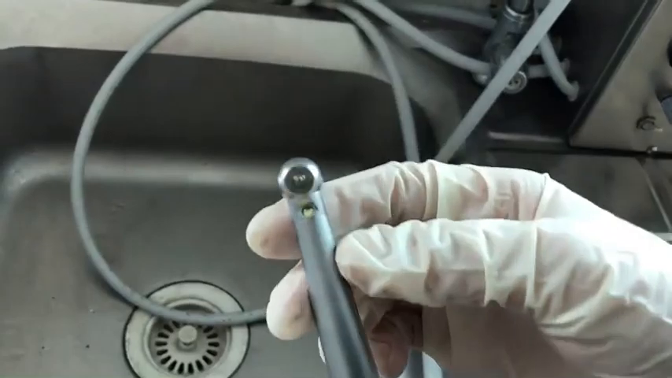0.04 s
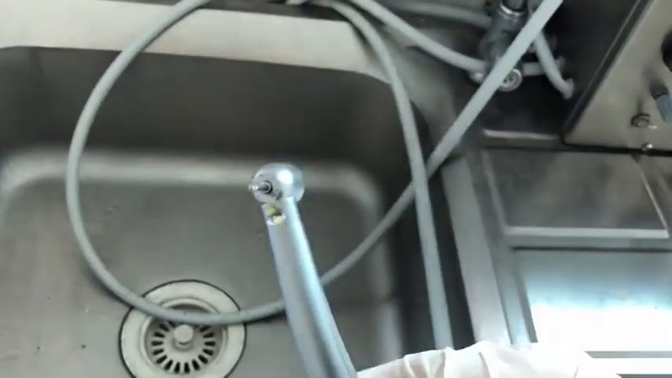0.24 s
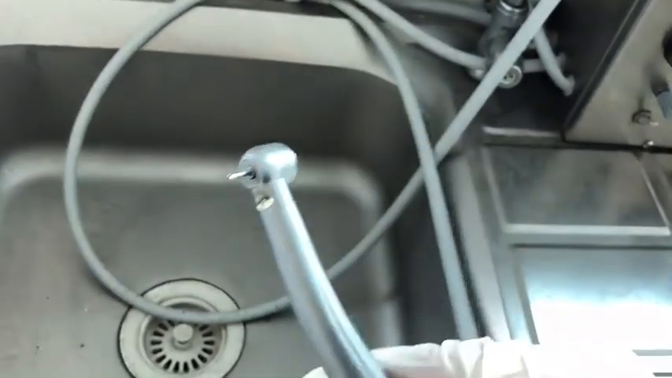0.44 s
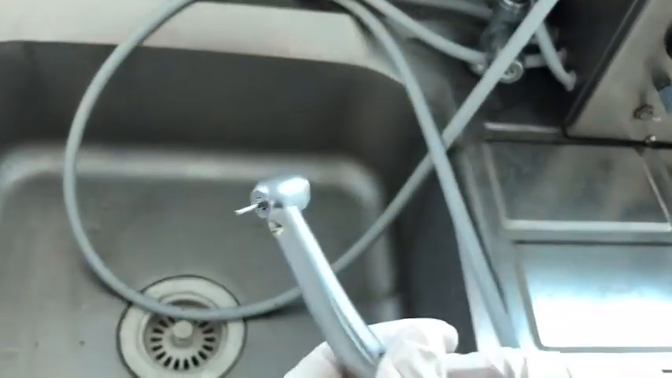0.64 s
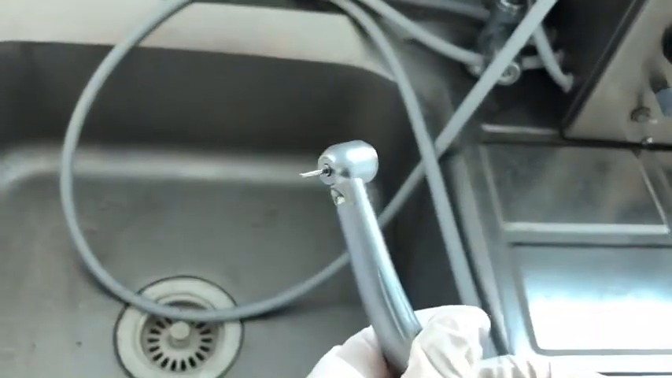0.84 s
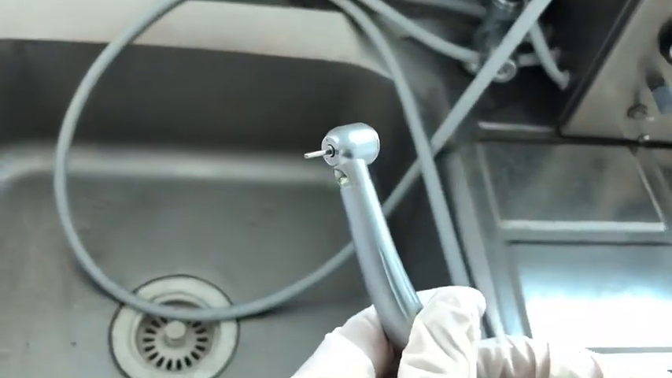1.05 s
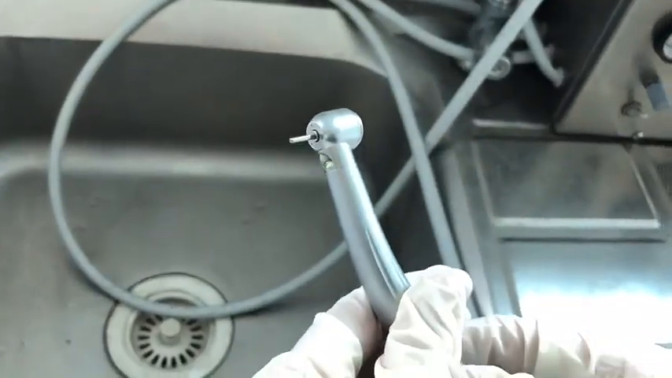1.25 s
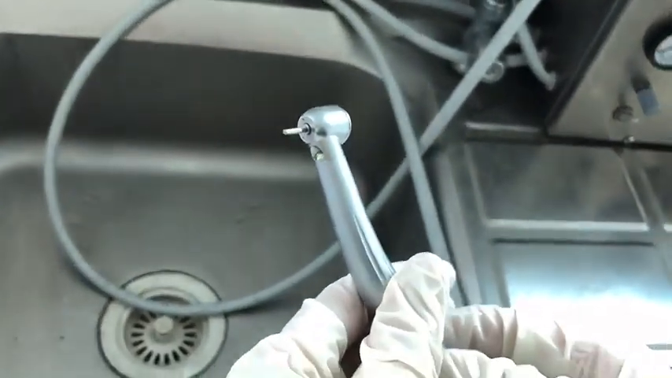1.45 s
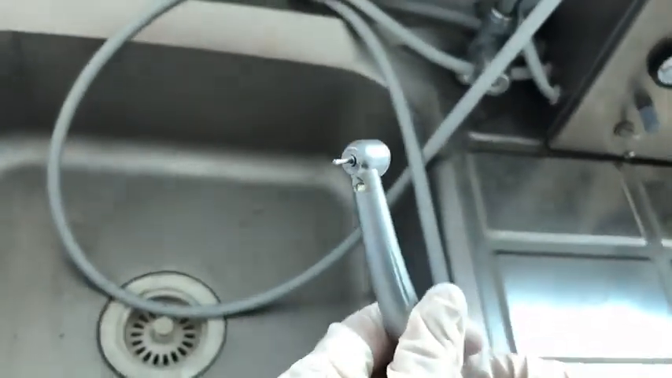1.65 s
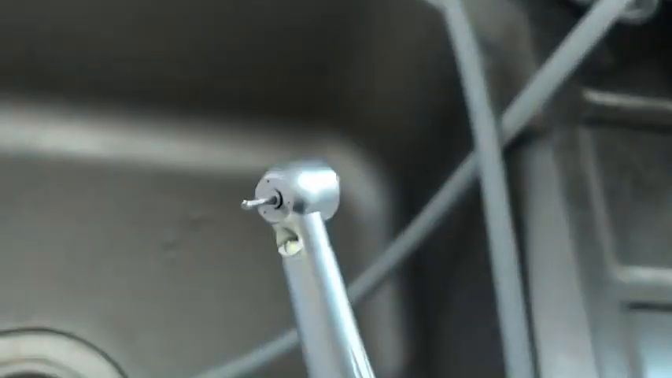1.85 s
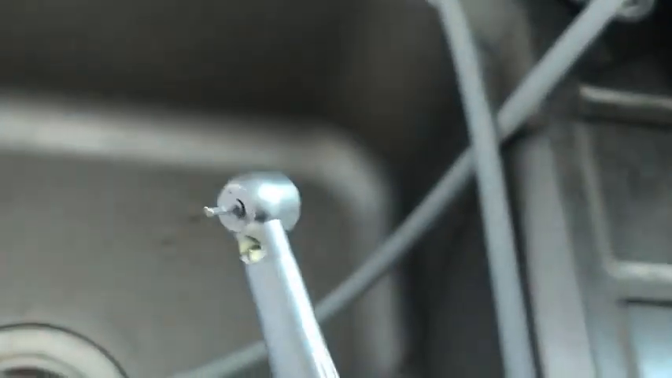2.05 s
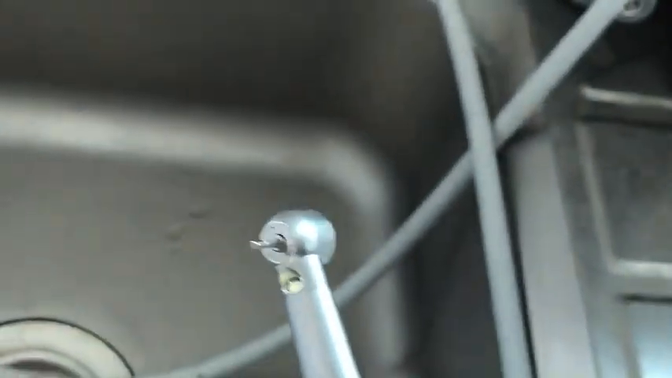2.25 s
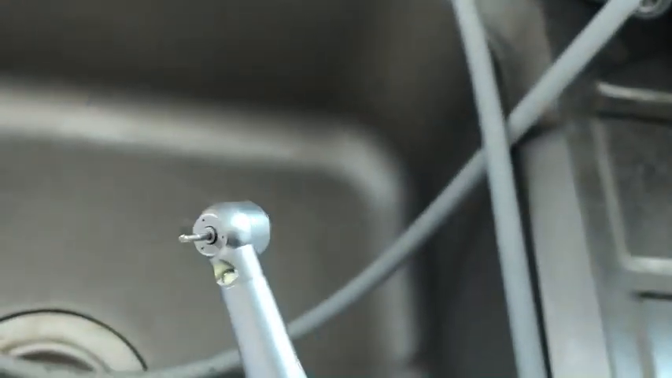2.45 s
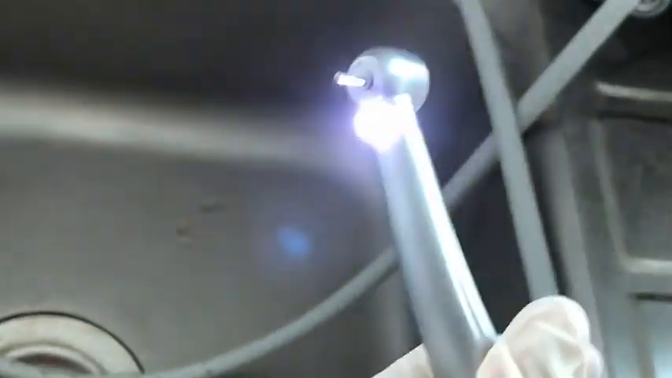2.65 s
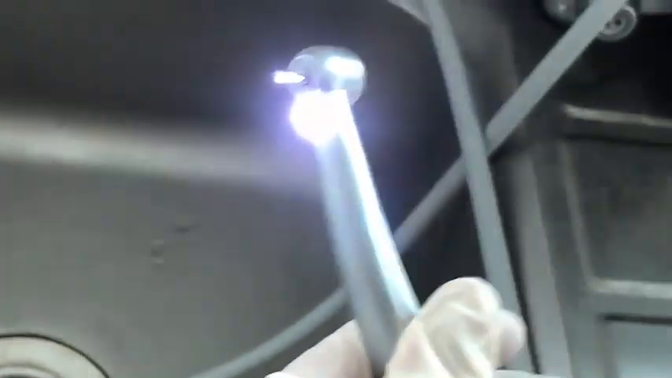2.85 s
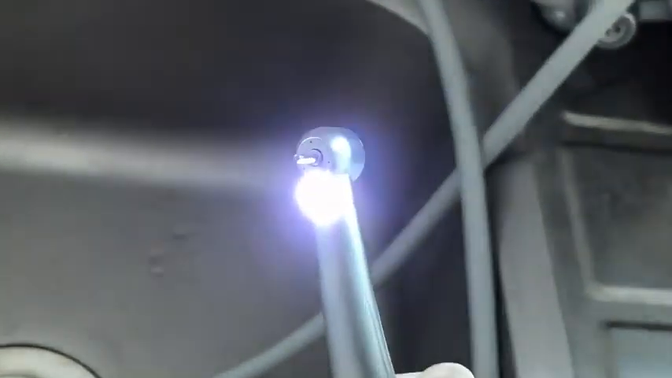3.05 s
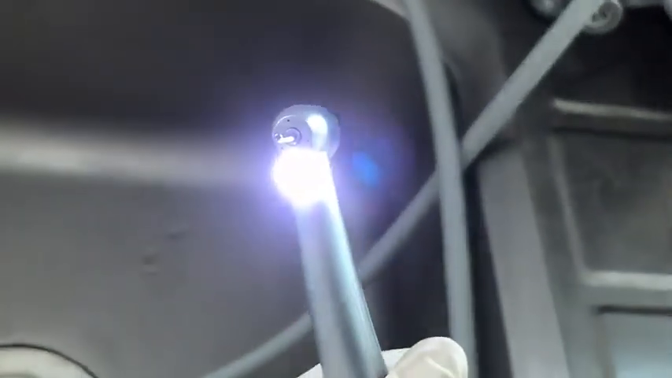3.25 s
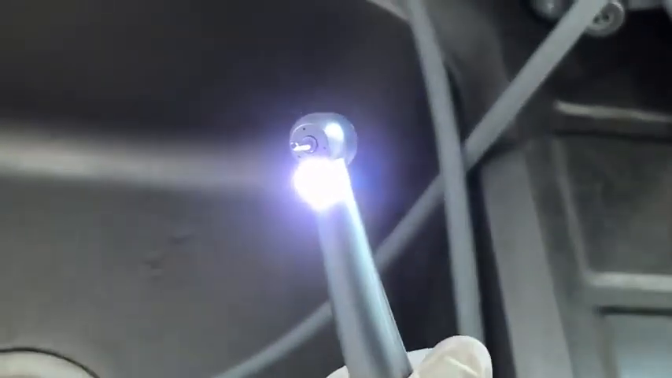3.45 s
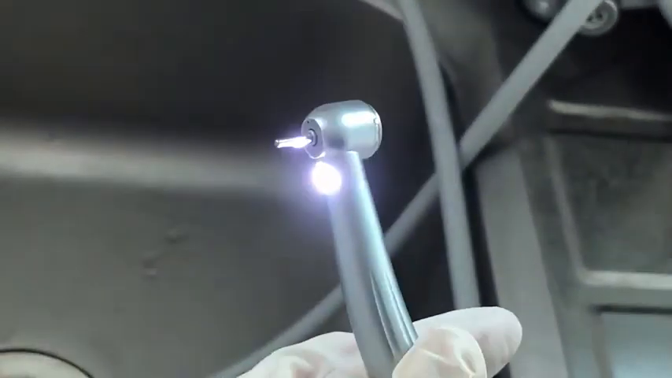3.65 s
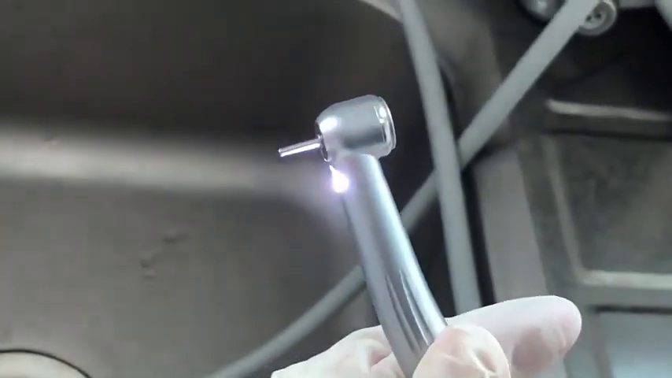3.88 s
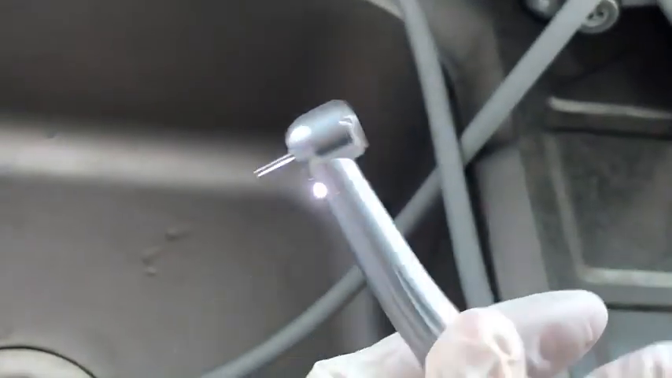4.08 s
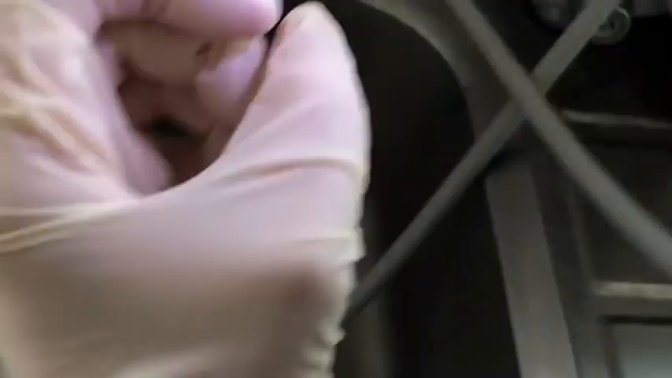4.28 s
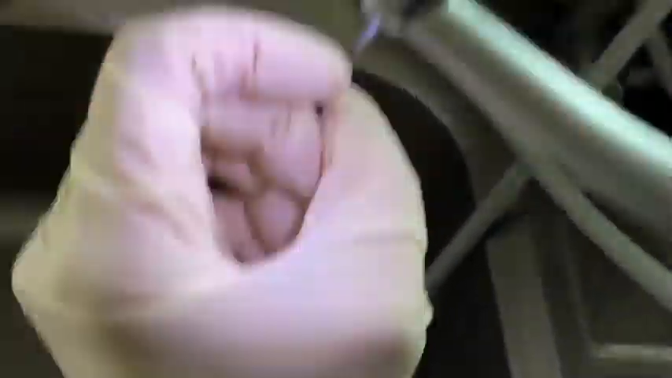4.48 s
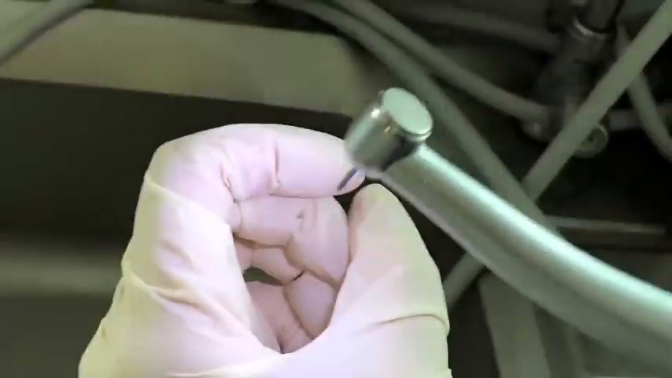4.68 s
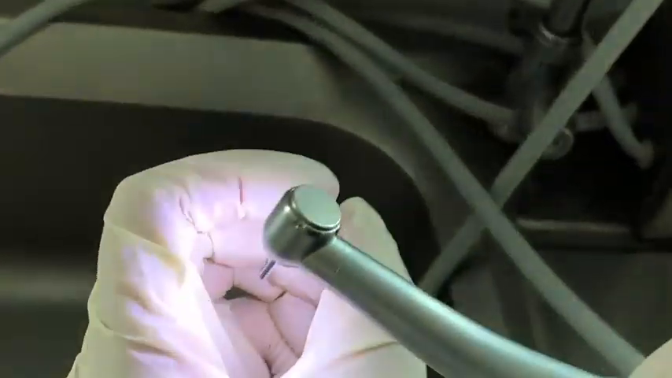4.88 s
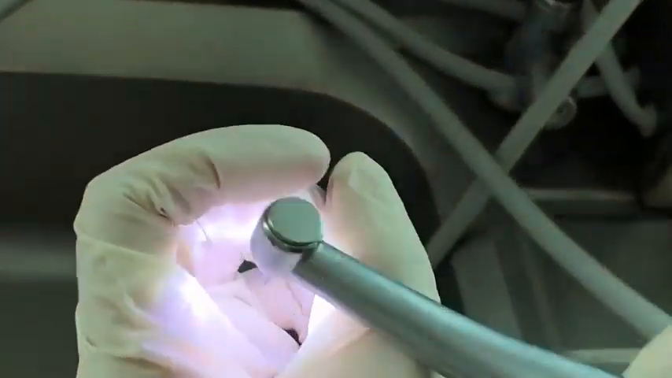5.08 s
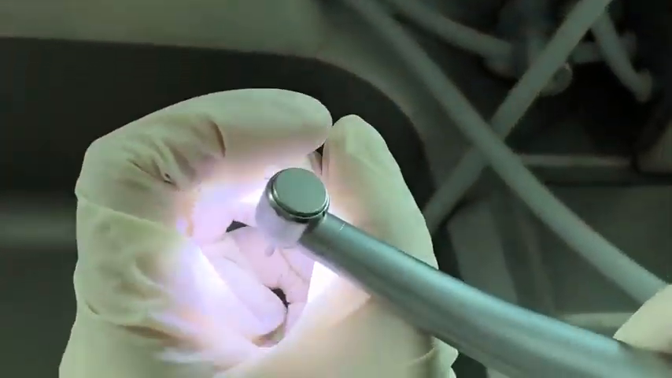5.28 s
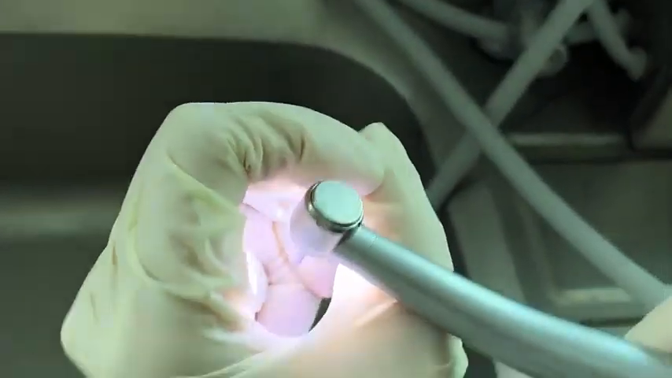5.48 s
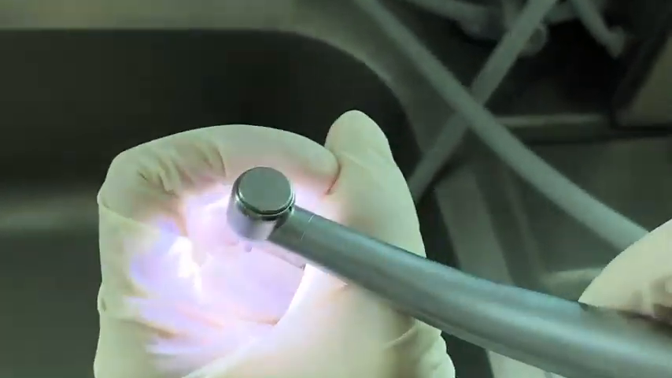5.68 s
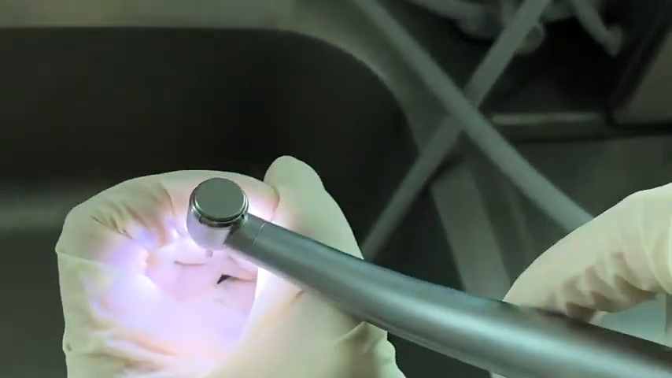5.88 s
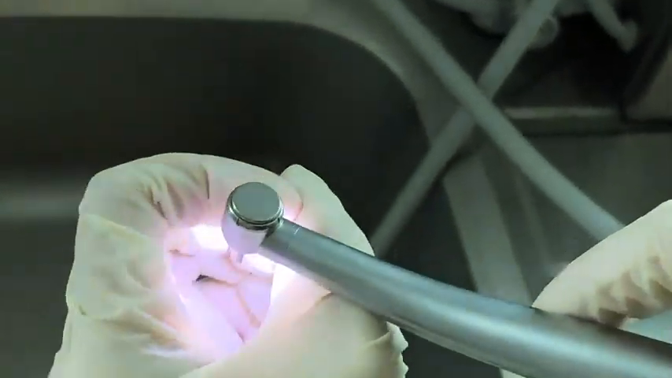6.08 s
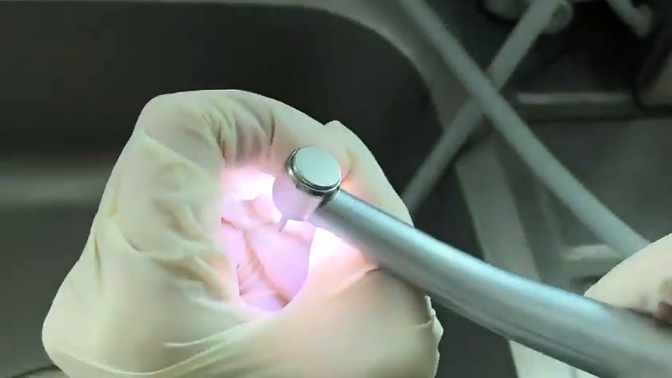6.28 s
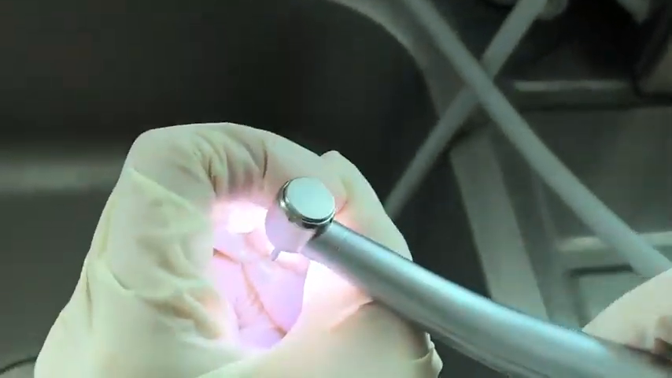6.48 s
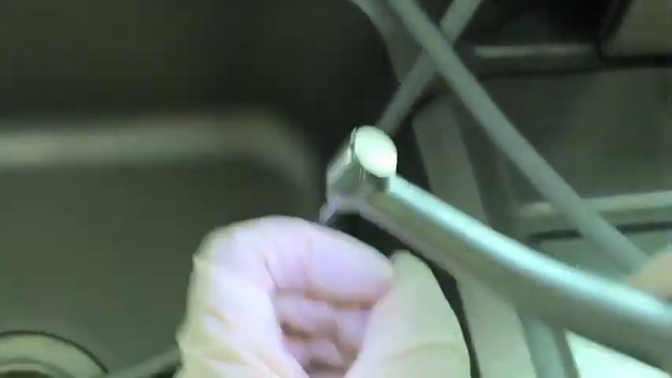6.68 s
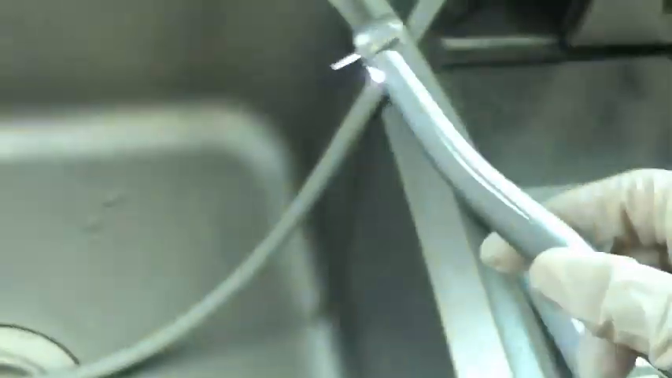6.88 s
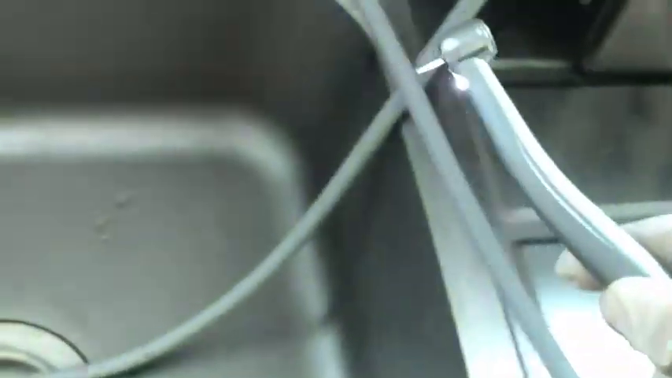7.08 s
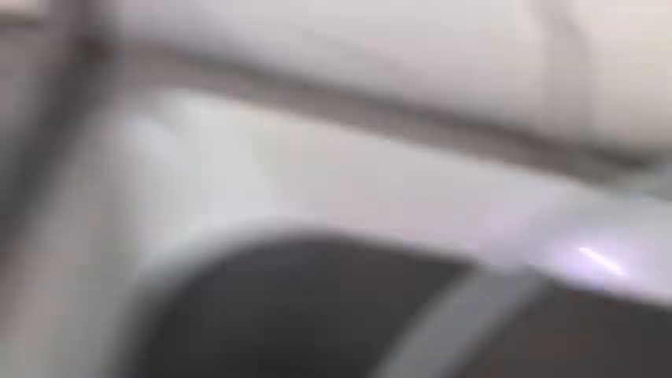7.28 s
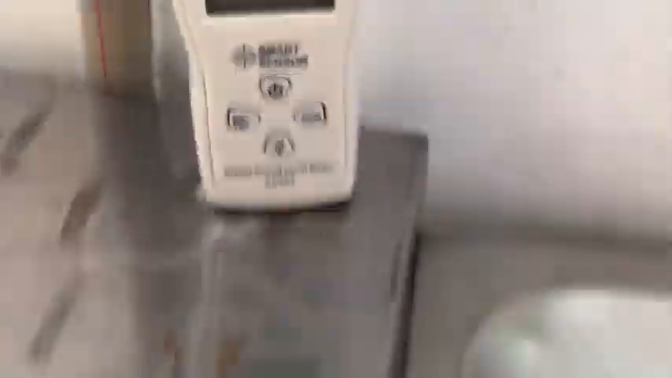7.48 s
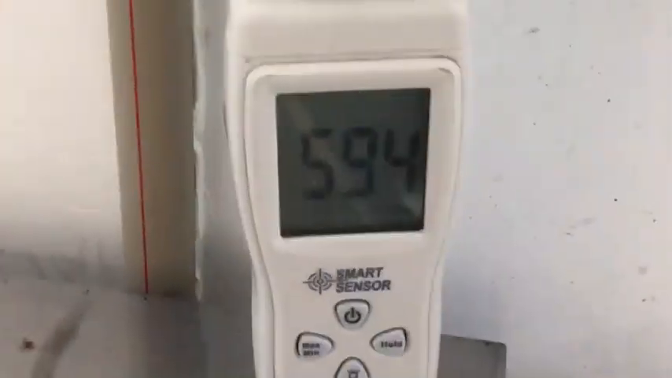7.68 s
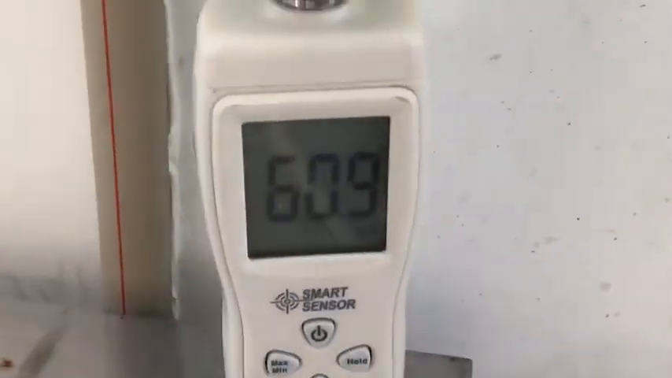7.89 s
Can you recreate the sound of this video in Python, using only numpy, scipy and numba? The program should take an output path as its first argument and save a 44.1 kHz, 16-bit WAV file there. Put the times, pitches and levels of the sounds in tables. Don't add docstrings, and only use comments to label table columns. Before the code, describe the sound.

Over a metal sink, compressed air blows and clicks off, then a small air-driven drill whines steadily in hiss that shifts as it moves.

```python
import sys
import numpy as np
from scipy import signal
from scipy.fft import rfft, irfft, next_fast_len
from scipy.io import wavfile
from scipy.ndimage import uniform_filter1d
from numba import njit

SR = 44100
rng = np.random.default_rng(int(sys.argv[2]) if len(sys.argv) > 2 else 0)


def volts(x):
    e = np.asarray(x, float) / 20
    return 10 ** e


def dump(signal):
    limited = np.clip(np.atleast_2d(signal).T, -1, 1)
    pcm = np.round(limited * 32767).astype(np.int16)
    wavfile.write(sys.argv[1], SR, pcm)


N = 349713
BRIEF = 16384

# freq_hz, density_db
ROOM_AIR = [(24, -44), (40, -14), (91, -11), (136, -5), (224, -21), (260, 6.5), (294, 11), (449, -37),
            (535, -14), (2270, -35.5), (15500, -48.5)]
ROOM_DB = -76.5
# time_s, pitch_hz, level_db
PUMP = [(2.25, 246.6, -90), (2.4, 246.4, -65), (2.6, 240, -81), (2.85, 227.7, -62.5), (3.1, 203, -74),
        (3.2, 200, -86.5)]

# middle_s, length_s, push_db, rumble_db, flap_db
GUSTS = [(.23, 0.15, -75, -70, -95), (.42, 0.15, -81, -91, -84), (.7, .1, -88, -78, -83),
         (2.5, 0.49, -99, -86.5, -71.5), (4.75, 0.31, -85, -80, -77), (6.08, 0.26, -80, -96, -75),
         (6.92, 0.042, -80, -69, -76), (7.68, 0.13, -87, -83, -84), (1.232, 0.064, -95, -63, -57.5),
         (2.0, 0.26, -101, -85, -72), (2.16, 0.078, -101, -96, -64), (2.491, 0.049, -95, -59, -59.5),
         (2.64, 0.055, -88, -84, -74), (3.345, 0.39, -61, -48.5, -45.5), (3.515, 0.036, -67, -48, -44.5),
         (3.67, 0.1, -67, -64, -105), (3.565, 0.036, -70, -56, -63), (3.97, .04, -62, -58, -73),
         (3.95, 0.33, -66, -62.5, -93), (4.171, 0.082, -72, -87, -54.5), (4.42, 0.29, -72, -70, -70),
         (5.88, 0.17, -71, -59, -74), (7.9, 0.21, -68, -68, -95), (7.85, 0.027, -80, -58.5, -74),
         (7.905, .04, -80, -57, -72)]
# push_db, rumble_db, flap_db
CALM_DB = (-91, -73.5, -74.5)
# middle_s, length_s, level_db
SLAPS = [(3.17, .03, -56), (3.21, .022, -48), (3.252, .04, -51), (3.325, .018, -51), (3.347, .018, -48),
         (3.39, .035, -58), (3.445, .035, -52), (3.514, .025, -47)]

# start_s, level_db, centre_hz, decay_s
TICKS = [(0.187, -63, 7800, 0.0013), (.295, -75, 8000, 0.011), (.437, -76, 6000, .008),
         (.658, -80, 6000, .004), (.695, -70.5, 6860, 0.011), (0.821, -77, 5500, .004),
         (2.326, -64, 13000, 0.001), (2.326, -69, 4000, 0.001), (2.354, -70, 8800, 0.002),
         (2.421, -66, 12000, .0015), (2.477, -61, 12000, 0.003), (2.477, -68, 6000, 0.0026),
         (2.641, -50, 9000, .004)]
# middle_s, length_s, level_db
RUSTLE = [(.18, .035, -80.5), (.25, 0.065, -84.5), (.42, .05, -90), (.446, 0.022, -79), (.595, 0.097, -80),
          (.68, .045, -80), (.74, 0.035, -81), (2.17, .06, -75), (2.23, 0.047, -78), (2.379, 0.0063, -53),
          (2.41, 0.054, -81), (2.53, 0.05, -80)]

# start_s, level_db, rise_s, decay_s
PUFFS = [
    (1.082, -60.5, 0.0079, 0.041),
    (1.203, -44.5, 0.017, 0.014),
    (1.953, -38, 0.018, 0.017),
    (2.118, -42, .016, 0.0087),
    (2.362, -49.5, .016, 0.0061),
    (2.6, -58, 0.009, 0.053),
    (4.137, -44.5, 0.016, 0.041),
]
# freq_hz, density_db
PUFF_COLOURS = [
    [(240, -39), (400, -8), (605, -11), (761, -3), (1930, -19), (2400, -11), (9070, -43), (15500, -68)],
    [(240, -46), (400, -17), (972, 1.5), (1850, -4), (2320, -3.5), (5480, -15.5), (10600, -11),
     (15500, -18)],
    [(350, -50), (600, -13.5), (1470, -19), (1990, -6), (2220, -19), (3980, -14), (4620, -4), (15500, -6)],
    [(150, -32), (250, -4.5), (603, -18), (1510, -3.5), (2090, -22), (2570, -10.5), (4390, -22.5),
     (15500, -19)],
    [(290, -48), (500, -18), (2260, 0), (2540, -9), (4500, -7), (4980, 3), (7780, -29), (12300, -13)],
    [(240, -38.5), (400, -6), (797, 1.5), (1760, -14), (2370, -9), (8000, -26), (10400, -51), (17600, -120)],
    [(150, -32), (328, -14), (936, 3.5), (1350, -0.5), (2360, -6), (3000, -17.5), (3900, -51), (6600, -120)],
]
# start_s, centre_hz, width_hz, level_db, decay_s
AFTER_RINGS = [(7.33, 5640, 150, -54.5, 0.013), (1.08, 780, 100, -63, 0.03), (1.085, 2420, 160, -68, .04),
               (1.225, 1100, 200, -58, .02), (1.23, 200, 80, -58, .03), (1.079, 2500, 900, -61.5, .004),
               (1.214, 1400, 1200, -46, 0.0057), (1.965, 9700, 500, -55, .02),
               (1.965, 12100, 600, -50, 0.018), (1.965, 14600, 900, -52, 0.017),
               (1.085, 5900, 1400, -73, 0.032), (1.09, 9000, 700, -84, .02), (1.09, 12200, 900, -86, .02),
               (1.09, 4000, 400, -74, .05), (2.118, 1430, 200, -50, 0.007), (2.122, 2550, 200, -56, .006),
               (2.362, 2250, 200, -56, 0.006), (2.37, 2350, 90, -70, .02), (2.365, 5100, 400, -57, .006),
               (1.97, 1890, 180, -63.5, 0.051), (1.97, 4840, 900, -50.5, 0.036),
               (2.13, 1240, 620, -59, 0.036), (2.139, 390, 39.5, -60.5, 0.062),
               (2.381, 2540, 500, -68.5, .04), (2.381, 4300, 1500, -67, 0.031)]
# start_s, level_db, centre_hz, decay_s
SCUFFS = [(0., -76, 2190, 0.026), (2.485, -63.5, 684, 0.046), (4.068, -58, 750, 0.038),
          (7.03, -65, 900, 0.011), (7.717, -60, 2000, 0.015)]
# start_s, length_s, from_hz, to_hz, level_db
PEDAL_THUMP = [(2.47, .06, 138, 175, -54)]

# time_s, level_db
JET_LEVEL = [(1.2, -68), (1.228, -55), (1.262, -45), (1.31, -44.5), (1.952, -44.5), (1.992, -65),
             (2.05, -79)]
# freq_hz, density_db
JET_AIR = [(290, -57), (500, -20), (2160, -12), (2930, -3), (3190, -10), (4070, -10), (4640, -19),
           (5200, 1.5), (15500, -16)]
# centre_hz, width_hz, level_db
JET_PIPE = [(2000, 130, -14), (2450, 160, -7), (3000, 110, -7), (3500, 160, -3), (3900, 220, -3.5),
            (4200, 290, -1.5), (5180, 280, 0.5), (5700, 85, -6), (6100, 120, -6), (6730, 140, -21),
            (7150, 110, -24), (7700, 200, -10.5), (8800, 610, -10.5)]

# time_s, whine_db, octave_db
WHINE = [(2.69, -70, -90), (2.8, -64, -90), (2.91, -67, -90), (3.05, -57, -85), (3.3, -49, -78),
         (3.64, -43.5, -80), (3.86, -50, -77), (4.06, -58, -74), (4.42, -55, -68), (4.75, -53, -69),
         (5.2, -47, -58), (5.52, -54, -65), (6.1, -51.5, -58), (6.63, -52.5, -68), (6.72, -58, -65),
         (7.55, -57, -66), (7.64, -73, -72), (7.93, -72, -78)]
# middle_s, length_s, hidden_share_db
HIDDEN = [(2.815, .012, -3), (2.9, .06, -3), (3., .012, -3), (3.35, .025, -4), (3.88, .03, -2.5),
          (4.27, .14, -1), (4.56, .12, -8), (4.67, .025, -2.5), (4.91, .03, -4), (5.76, .03, -4),
          (6.62, .02, -2.5), (6.76, .06, -5), (7.02, .08, -8), (7.24, .06, -4), (7.5, .03, -1.5)]
START_S, SPIN_UP_S, BUILD_S = 2.65, .237, 2.5
FREE_HZ, PEAK_S, SAG_HZ_PER_S = 6387, 4.2, 23.5
BLADES = 8
# start_s, length_s,
# from_hz, to_hz,
CATCHES = [(2.645, 0.008, 2900, 800, -50), (2.655, .018, 2300, 3700, -57), (2.67, 0.022, 3800, 5300, -46),
           (2.683, 0.02, 4800, 6100, -47), (2.671, .015, 13400, 15400, -40), (2.68, .013, 9700, 11300, -44),
           (2.695, 0.02, 8800, 10700, -47), (2.71, 0.029, 13100, 15100, -31.5),
           (2.83, 0.037, 4270, 4760, -58)]
# time_s, hiss_db, aim_db
RUSH = [(2.6, -82, -2), (2.63, -68, 4), (2.644, -58, 13.5), (2.696, -43, 8), (2.716, -52, 7)]
# time_s, hiss_db, aim_db
EXHAUST = [(2.8, -49.5, 2), (3.19, -51, 0), (4.0, -48.5, -3), (4.4, -49, 1.7), (4.8, -50, -2.5),
           (5.04, -49.5, -1.5), (5.34, -48, -8.5), (5.58, -50, -5), (5.66, -49.5, 1.5), (5.89, -51, -1.5),
           (6.33, -49, -1.5), (6.64, -49.5, -3.5), (6.7, -51.5, 1), (6.86, -51, -5), (7.3, -53.5, 4.5),
           (7.5, -55.5, 3.5), (7.93, -54.5, 2.5)]
# freq_hz, density_db
DULL_HISS = [(180, -23), (300, -9), (553, -21.5), (1460, -12.5), (1640, -12.5), (3400, -12), (5850, -6.5),
             (6150, -19.5), (6680, -14), (8280, -19), (15500, -14)]
# centre_hz, width_hz, level_db
HEAD_HOLLOWS = [(752, 104, 0), (2320, 90, -0.5)]
# time_s, hollows_db, cage_db, hand_hz
CUPPED = [(2.6, -34, -34, 1500), (4.25, -14, -20, 1500), (4.45, -13, -12, 1520), (4.85, -12.5, -14, 1580),
          (5.1, -10, -14, 1720), (5.5, -13, -14, 1650), (6.1, -10, -13, 1680), (6.45, -9.5, -8, 1690),
          (6.75, -15, -10.5, 1620), (7.05, -13, -13, 1490), (7.35, -18, -16, 1500), (7.53, -16, -6, 1500),
          (7.64, -24, -26, 1500), (7.93, -22, -26, 1500)]
# start_s, length_s, centre_hz, width_hz, change_db
SHADES = [(2.627, .045, 2500, 4000, 10), (2.747, .14, 11100, 3000, -0.5), (2.75, 1.1, 2300, 3900, -1),
          (2.912, 0.77, 11700, 1590, 5), (4.2, 0.37, 4660, 2500, 2.5), (4.204, .45, 9100, 2500, 3),
          (4.916, 0.079, 13200, 5000, 4), (4.996, 0.39, 11200, 4450, -8.5), (5.6, .3, 10500, 4000, -5),
          (2.75, 1.3, 3300, 900, 1.5), (6.74, .25, 1250, 500, -4), (6.082, .6, 8100, 1800, 3),
          (6.18, .5, 13200, 2000, -2), (7.3, .2, 10300, 3000, -2), (6.7, 1.22, 3400, 1500, 0.5),
          (6.7, 1.22, 895, 900, -1.5), (4.15, 1.2, 4700, 1500, 0.5), (5.0, 1.1, 1900, 1490, 1.5),
          (6.896, 1.0, 4570, 700, 3.5), (7.746, .18, 1000, 1200, -5), (7.348, .38, 2600, 2400, -1),
          (7.45, .47, 8400, 1500, -1.5)]
DULL_DB, DULL_LAG = -8, 0.31
EDGE_DB, EDGE_AIM = 0, 0.59

SINK_T60_S, SINK_DB = 0.62, -18
# time_s, echo_share
WALL = [(7.45, 0.), (7.6, 0.5), (7.93, 0.3)]
WALL_LAG_S = .001486


def unit(x):
    return x / np.sqrt(np.mean(x ** 2))


def curves(table, off=-120.):
    s, *columns = np.transpose(table)
    t = np.arange(N) / SR
    return [np.interp(t, s, c, off, off) for c in columns]


def swells(table, edge=3.8):
    s, length, *db = np.transpose(table)
    at = np.arange(0, N, 32)
    shape = np.exp(-abs(2 * (at / SR - s[:, None]) / length[:, None]) ** edge)
    return [np.interp(np.arange(N), at, g) for g in volts(db) @ shape]


def walk(rate):
    k = int(SR / rate)
    held = np.repeat(rng.standard_normal(N // k + 1), k)
    return 1.23 * uniform_filter1d(uniform_filter1d(held, k), k)[:N]


def shaped(gain, size):
    fast = next_fast_len(size, True)
    hz = np.arange(1, fast // 2 + 2) * SR / fast
    return unit(irfft(rfft(rng.standard_normal(fast)) * gain(hz), fast)[:size])


def air(shape, lo_hz=20., hi_hz=21300.0, slope=2.9, size=N):
    f, db = np.transpose(shape)

    def gain(hz):
        edges = (1 + (lo_hz / hz) ** (2 * slope)) * (1 + (hz / hi_hz) ** (2 * slope))
        return volts(np.interp(np.log(hz), np.log(f), db)) / np.sqrt(edges)
    return shaped(gain, size)


def band(lo_hz, hi_hz, slope=0.99, size=N):
    return air([(20, 0), (20000, 0)], lo_hz, hi_hz, slope, size)


def ring(modes, size=N):
    def gain(hz):
        power = sum(volts(2 * db) / (1 + (2 * (hz - f) / w) ** 2) ** 1.15 for f, w, db in modes)
        return np.sqrt(power)
    return shaped(gain, size)


@njit
def svf(x, hz, width):
    y, b, l = np.empty(len(x)), 0., 0.
    for i in range(len(x)):
        g, k = np.tan(np.pi * hz[i] / SR), width / hz[i]
        v = (b + g * (x[i] - l)) / (1 + g * (g + k))
        b, l, y[i] = 2 * v - b, l + 2 * g * v, k * v
    return y


def chirps(table, rough_db):
    out = np.zeros(N)
    for s, length, f0, f1, db in table:
        i, n = int(s * SR), int(length * SR)
        glide = np.sin(2 * np.pi * np.cumsum(np.linspace(f0, f1, n)) / SR)
        out[i:i + n] += volts(db + 3.5) * np.hanning(n) ** .5 * glide
    return out * volts(rough_db * walk(500))


def add(out, s, db, rise_s, decay_s, sound):
    i, t = int(s * SR), np.arange(BRIEF) / SR
    rise = np.sin(np.pi / 2 * np.clip(t / rise_s, 0, 1)) ** 2
    fall = 1 / np.cosh(np.minimum(np.maximum(t - rise_s, 0) / decay_s, 40))
    out[i:i + BRIEF] += (volts(db) * rise * fall * sound)[:N - i]


def room():
    hz, db = curves(PUMP)
    pump = volts(db) * np.sin(2 * np.pi * np.cumsum(hz) / SR)
    return volts(ROOM_DB) * air(ROOM_AIR, 794) + pump


def buffet():
    push_gain, rumble_gain, flap_gain = (g + volts(db) for g, db in zip(swells(GUSTS), CALM_DB))
    lumps_db = 2.3 * walk(90)
    push = band(42, 98, 5.9) * push_gain
    rumble = band(136.3, 151.6, 5.6) * rumble_gain * volts(0.15 * lumps_db)
    flap = band(175, 370, 4.2) * flap_gain * volts(lumps_db - 2.5)
    slaps = band(300, 600, 4.0) * swells(SLAPS, 1.8)[0]
    return push + rumble + flap + slaps


def glove():
    rustle = band(5160, 5300, 6.4) + 1.05 * band(1300, 14000)
    out = rustle * swells(RUSTLE)[0] * volts(2 * walk(58.02))
    for s, db, hz, decay_s in TICKS:
        add(out, s, db, .0007, decay_s, ring([(hz, 7000, 0)], size=BRIEF))
    return out


def puffs():
    out = chirps(PEDAL_THUMP, 0.66)
    for (s, db, rise_s, decay_s), colour in zip(PUFFS, PUFF_COLOURS):
        add(out, s, db, rise_s, decay_s, air(colour, size=BRIEF))
    for s, hz, width, db, decay_s in AFTER_RINGS:
        add(out, s, db, .01, decay_s, ring([(hz, width, 0)], size=BRIEF))
    for s, db, hz, decay_s in SCUFFS:
        add(out, s, db, .015, decay_s, ring([(hz, hz, 0)], size=BRIEF))
    return out


def jet():
    blow = volts(-8.) * air(JET_AIR) + volts(-3.0) * ring(JET_PIPE)
    return blow * volts(curves(JET_LEVEL)[0] + .5 * walk(20.2))


def shaft():
    on = np.maximum(np.arange(N) / SR - START_S, 0)
    free_hz = FREE_HZ - SAG_HZ_PER_S * abs(np.arange(N) / SR - PEAK_S)
    hz = free_hz * np.tanh(on / SPIN_UP_S * (1 + on / BUILD_S))
    return hz, 2 * np.pi * np.cumsum(hz + 5 * walk(30)) / SR


def whine(hz, turn):
    whine_db, octave_db = curves(WHINE)
    whine_db = whine_db + 3 + 1.5 * walk(45) + 2 * (hz < 6000) * walk(120)
    once = (1 - swells(HIDDEN)[0]) * volts(whine_db) * np.sin(turn)
    out = once + volts(octave_db + 3 + 2.5 * walk(30)) * np.sin(2 * turn)
    blade_hz = np.minimum(BLADES * (190 + 24000 * np.arange(BRIEF) / SR), 18000)
    add(out, 2.66, -39, .055, .012, svf(rng.standard_normal(BRIEF), blade_hz, 3000.))
    return out + chirps(CATCHES, 2.5)


def exhaust(turn):
    hiss_db, aim_db = curves(RUSH + EXHAUST)
    dull_db = DULL_DB - DULL_LAG * np.clip(hiss_db + 52, -6, 9)
    edge_db = EDGE_DB + EDGE_AIM * aim_db
    cage = volts(.6 + 1.6 * walk(30)) * np.sin(.4025 * turn + 1.6 * walk(25))
    facing_db, cage_db, hand_hz = curves(CUPPED, off=-24.0)
    hand_hz = np.clip(hand_hz, 1000, 3000) * (1 + .015 * walk(6))
    hand = unit(svf(svf(rng.standard_normal(N), hand_hz, 260.), hand_hz, 260.))
    hollows = volts(-4.) * ring(HEAD_HOLLOWS) + volts(-1.5) * hand
    dull = volts(1.0) * air(DULL_HISS, 200, 6350, slope=12)
    dull = dull + volts(facing_db) * hollows + volts(cage_db) * cage
    bright, edge = band(6130, 11200, 6.9), band(12550, 13700, 4.8)
    top = air([(12000, -1.5), (15500, 10.0)], 11400, slope=8)
    parts = [(dull, dull_db), (bright, 0.4), (edge, edge_db), (top, aim_db + 7.5)]
    hiss = sum(x * volts(db + 0.71 * walk(12)) for x, db in parts)
    for s, length, centre_hz, width, db in SHADES:
        i, n = int(s * SR), int(length * SR)
        shaded = svf(hiss[i:i + n], np.full(n, 1. * centre_hz), 1. * width)
        hiss[i:i + n] += (volts(db * np.hanning(n) ** 0.13) - 1) * shaded
    return hiss * volts(hiss_db)


def turbine():
    hz, turn = shaft()
    return whine(hz, turn) + exhaust(turn)


def scene():
    near = jet() + puffs() + glove()
    t = np.arange(int(.4 * SR)) / SR
    tail = signal.lfilter([.3], [1, -.7], rng.standard_normal(len(t))) * volts(-60 * t / SINK_T60_S)
    sink = signal.fftconvolve(near, tail / np.sqrt(np.sum(tail ** 2)))[:N]
    rotor = turbine()
    bright = svf(rotor, np.full(N, 14000.), 9000.)
    rotor = rotor + curves(WALL, off=0.)[0] * np.roll(bright, round(WALL_LAG_S * SR))
    return np.tile(rotor + near + volts(SINK_DB) * sink + buffet() + room(), (2, 1))


def band_limit(x):
    return signal.sosfilt(signal.butter(12, 15520, fs=SR, output="sos"), x)


def record(dry):
    side, size = np.zeros(N), 2048
    hz = np.arange(size // 2 + 1) * SR / size
    for s, centre_hz in (2.8, 6300) + rng.random((36, 2)) * (4.7, 8100):
        i = int(s * SR) - size // 2
        piece = rfft(dry[0, i + size:i + 2 * size]) * (abs(hz - centre_hz) < 900)
        side[i:i + size] += volts(-3.5) * np.hanning(size) * irfft(piece)
    top_cut = signal.ellip(10, .1, 70, 15520, fs=SR, output="sos")
    mix = signal.sosfilt(top_cut, dry + np.array([side, -side]))
    return band_limit(mix)


dry = scene()
out = record(dry)
dump(out)
```